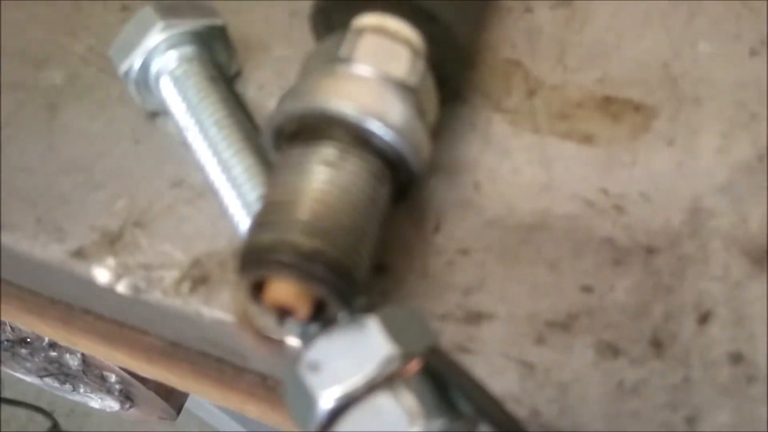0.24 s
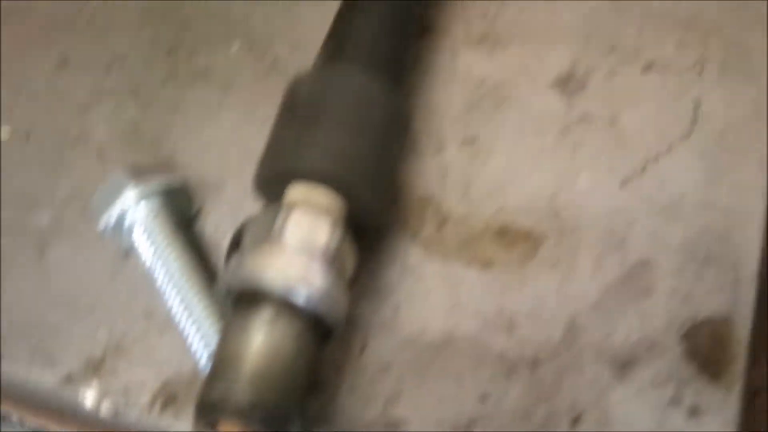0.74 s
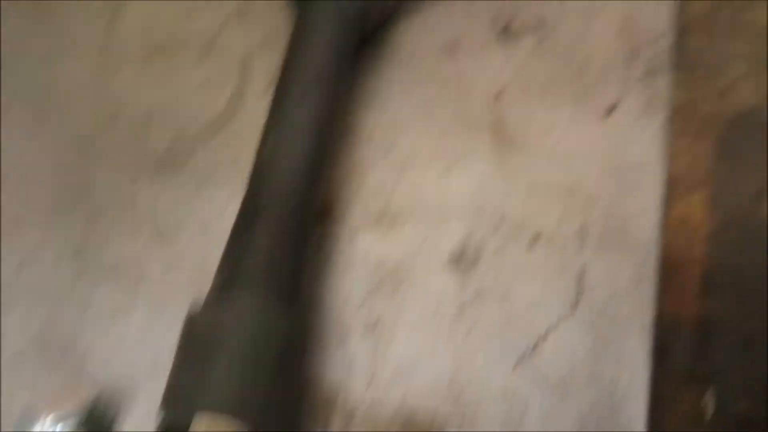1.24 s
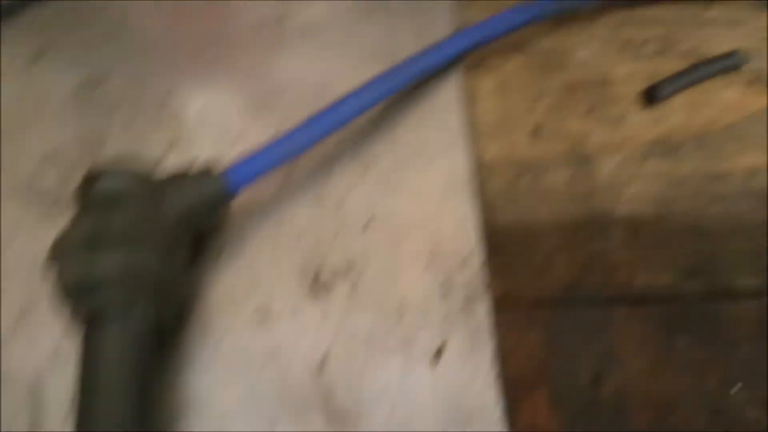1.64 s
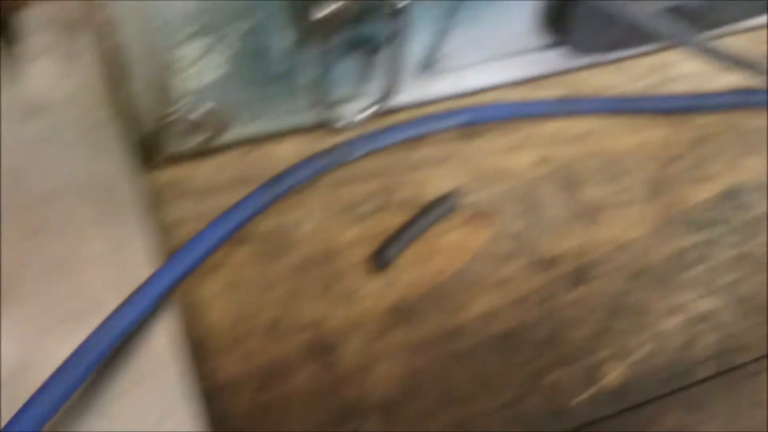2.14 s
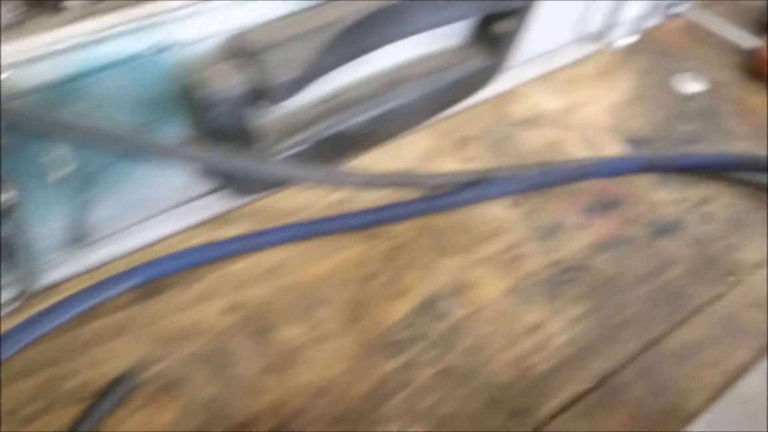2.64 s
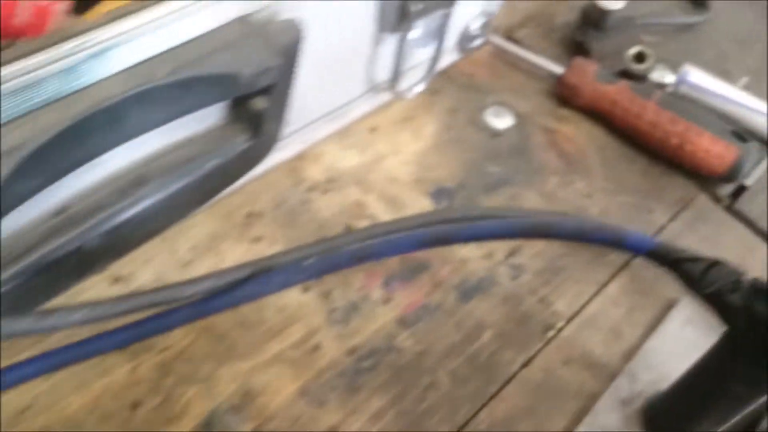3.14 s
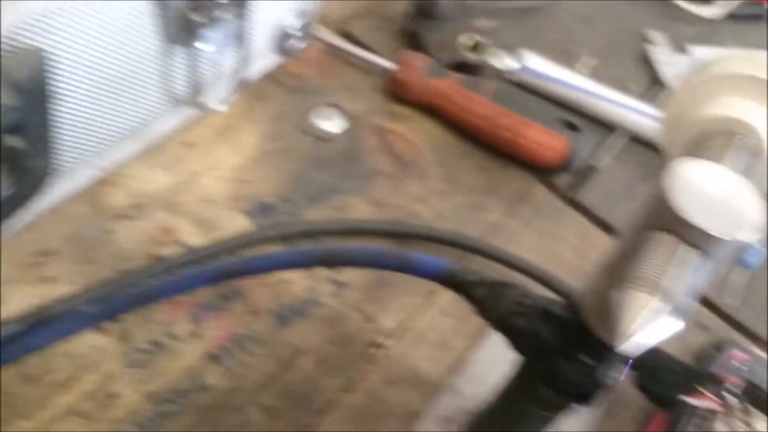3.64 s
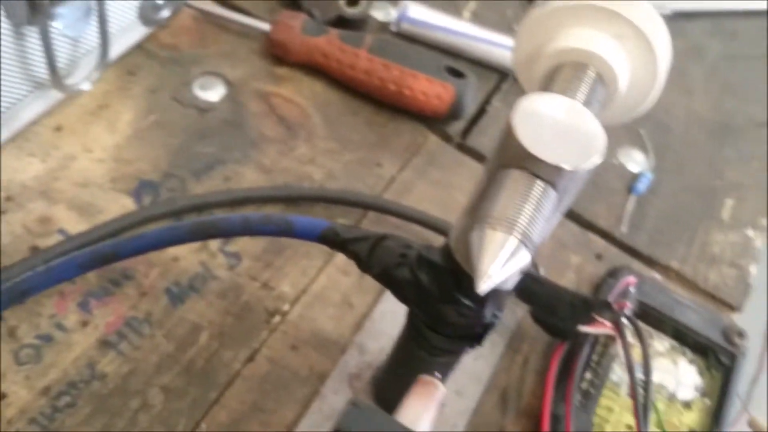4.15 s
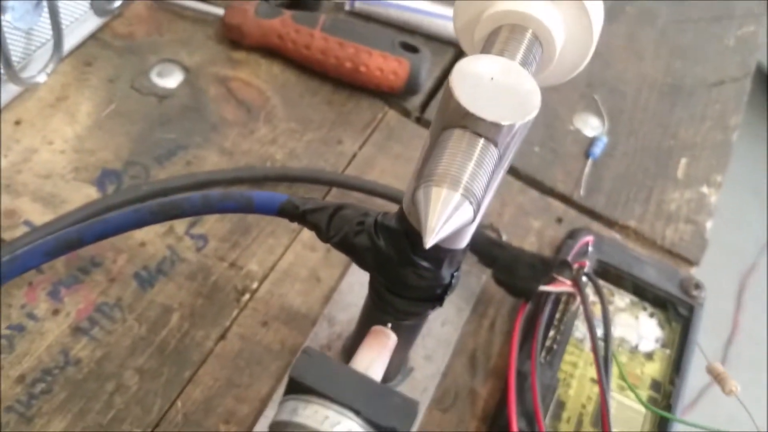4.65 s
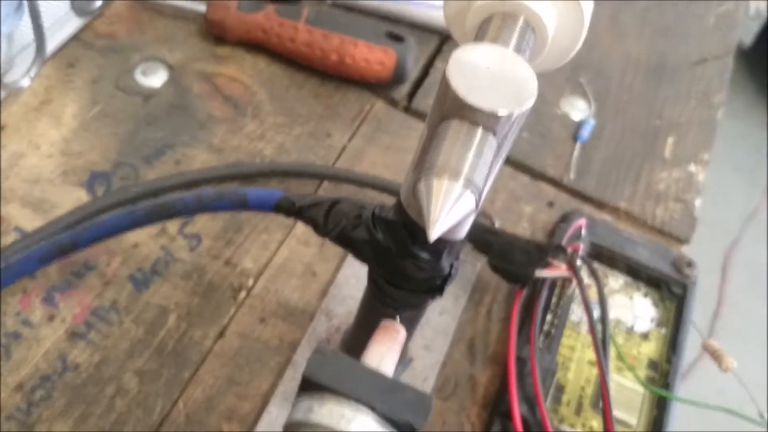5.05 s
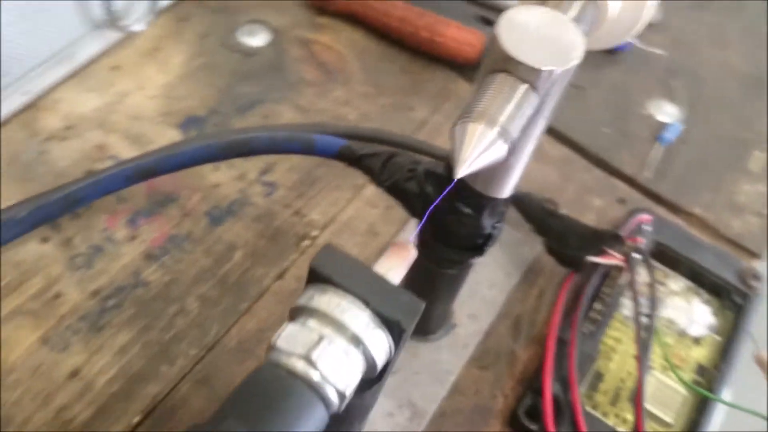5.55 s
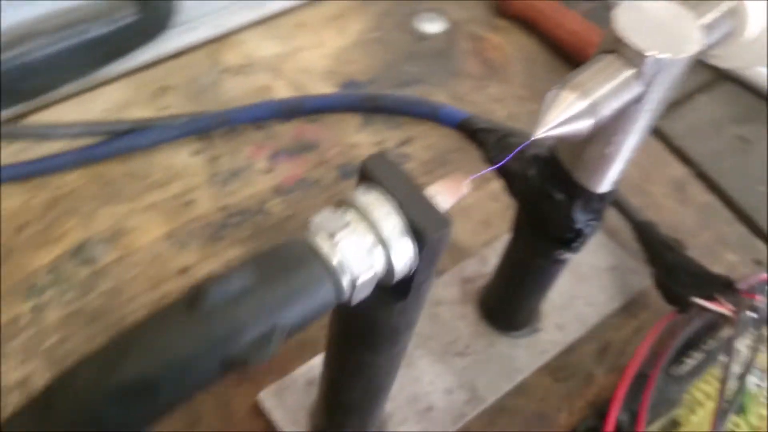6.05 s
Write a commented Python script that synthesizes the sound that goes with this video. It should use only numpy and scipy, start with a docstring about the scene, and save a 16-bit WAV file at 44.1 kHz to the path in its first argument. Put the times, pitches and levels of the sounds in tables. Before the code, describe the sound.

Sharp high-voltage sparks crackle quickly across a gap, close up, while an electric drill whines and rattles on a workbench.

```python
"""Sparks from an ignition coil snap across a spark plug and an open gap, 26 a second with some missing.
Each heats the air abruptly and launches a shock, which reflects off the workbench and its tools.
An electric drill turns the distributor: its motor whines and hums, its gears rattle and ring,
its brushes and fan hiss, and the bench resonates under it. A hand-held microphone with two ports
moves from the plug to the gap; the loudest snaps overload it."""
import sys
import numpy as np
from scipy import signal
from scipy.fft import rfft, irfft, next_fast_len
from scipy.io import wavfile
from scipy.ndimage import uniform_filter1d

SR = 44100
rng = np.random.default_rng(int(sys.argv[2]) if len(sys.argv) > 2 else 0)


def transcribe(u):
    """Save the signal u as a 16-bit wav file named by the first command-line argument.

    u: samples, shape (n,) or (channels, n), limited to [-1, 1]; the rate is SR.
    q: integer samples, one column per channel.
    """
    v = np.clip(np.atleast_2d(u).T, -1, 1)
    q = np.round(v * 32767).astype(np.int16)
    wavfile.write(sys.argv[1], SR, q)


N = 277389

# Microphone path. Each row: time in seconds, place from 0 at the plug to 1 at the gap.
MIC_PLACE = [(0, 0.14), (1.8, 0.13), (3.1, 0.82), (3.6, 1), (6.3, 0.9)]
# Likeness of the ports, near antiphase in the bass. Each row: frequency in Hz, correlation.
PORT_CORRELATION = [(30, -0.33), (130, -0.96), (300, -0.89), (640, -0.86), (1000, -0.46), (1400, 0.12),
                    (3000, 0.14), (7000, -0.049)]
# Motor speed. Each row: time in seconds, turns per second.
MOTOR_SPEED = [(0.0, 243.09), (0.3, 243.08), (0.6, 242.81), (0.9, 242.39), (1.35, 242.78), (1.7, 242.39),
               (2.0, 242.06), (2.3, 242.33), (2.7, 242.82), (3.2, 242.84), (3.7, 242.81), (4.2, 243.46),
               (4.7, 242.87), (5.4, 243.24), (5.75, 242.86), (6.29, 243.26)]
# Whine along the path. Each row: time in seconds, left and right level in dB. All levels are relative.
WHINE_LEVEL = [(0.01, -25, -61), (0.41, -28, -51), (0.59, -17.5, -42), (0.79, -28.5, -49), (1.21, -30, -35),
               (1.55, -20, -51), (1.93, -33.5, -40), (2.35, -19, -46), (2.45, -30, -50), (2.63, -19, -51),
               (2.81, -31, -36), (2.89, -19, -30), (3.19, -20, -29), (3.45, -35, -35), (3.59, -23, -44),
               (3.73, -32, -44), (4.99, -33.5, -35.5), (5.19, -27.5, -50), (5.61, -26, -61),
               (5.77, -32.5, -58), (6.01, -20, -52), (6.27, -29, -39)]
# Shaft harmonics, each changing once as the microphone moves. Each row: order, time of change in
# seconds, level before and after in dB, phase between the ports before and after in radians.
HUM_ORDERS = [(1, 2.8, -50, -58, 2.5, 2.5), (2, 1.65, -53, -45, 1.7, 3.0), (3, 1.9, -41.5, -46.3, 2.7, 1.8),
              (4, 3.0, -44, -48.5, 1.7, 1.5)]
# Drone of the bench. Each row: time in seconds, level in dB.
DRONE_LEVEL = [(0.0, -48.0), (0.06, -40), (0.14, -47.5), (0.18, -36), (0.35, -42), (0.4, -39), (0.61, -37),
               (0.71, -36), (1.07, -35.5), (1.14, -47), (1.31, -37), (1.36, -50), (1.39, -41), (1.7, -34.5),
               (1.83, -38), (2.0, -35.5), (2.13, -47.5), (2.16, -45), (2.41, -31), (2.57, -36), (2.68, -49),
               (2.83, -31), (2.94, -46), (3.04, -34), (3.15, -45.0), (3.4, -30), (3.56, -54), (3.6, -43.0),
               (3.75, -35), (3.81, -42), (3.97, -35), (4.05, -49.0), (4.23, -32), (4.35, -44), (4.48, -36),
               (4.62, -39), (4.81, -30), (4.98, -40), (5.25, -34), (5.31, -47), (5.63, -33), (5.95, -56),
               (6.04, -48), (6.28, -41)]
# Slow course of the drill's noise. Each row: time in seconds, rattle level in dB, hiss level in dB.
DRILL_LEVELS = [(0, -31, -28), (0.38, -31.5, -28.5), (0.6, -29, -28.5), (1.1, -31, -28.5),
                (1.35, -31, -29.5), (1.75, -29, -27), (2.05, -30, -27.5), (2.3, -30.5, -27),
                (2.6, -32, -28), (3.0, -33, -27.5), (3.3, -33.5, -29.5), (3.54, -36, -29.5),
                (3.8, -34.5, -29.5), (4.5, -34, -29.5), (4.95, -34.5, -30.5), (5.5, -33.5, -29.5),
                (5.87, -35.5, -30), (6.29, -34, -29)]
# Brief binding of the gears. Each row: centre and half-length in seconds, added rattle in dB.
GEAR_SURGES = [(0.198, 0.02, 2.5), (0.247, 0.027, 1.5), (0.52, 0.025, 0), (0.903, 0.036, 2.5),
               (1.06, 0.03, 0), (1.441, 0.03, 4), (1.878, 0.044, 2), (2.231, 0.017, 5.5), (2.408, 0.078, 2),
               (2.82, 0.052, 1.5), (3.08, 0.032, 1.5), (3.373, 0.05, 3), (3.696, 0.057, 3.5),
               (4.241, 0.022, 3), (4.44, 0.032, 3), (4.768, 0.096, 1), (5.567, 0.038, 3.5), (5.7, 0.026, 3),
               (6.062, 0.026, 5), (6.202, 0.022, 4.5)]
# Hard impacts of the teeth. Each row: start in seconds, level in dB.
TOOTH_KNOCKS = [(0.169, -10), (0.509, -9.5), (0.5688, -37), (0.8871, -8), (0.9094, -31), (1.083, -19),
                (1.1923, -15), (1.469, -11), (1.489, -20), (1.8246, -10), (2.2287, -17), (2.247, -24),
                (2.8533, -14), (2.9733, -11.5), (2.9931, -14), (4.4285, -22), (5.014, -15), (5.09, -17),
                (6.0112, -15)]
# Gear case modes. Each row: frequency and bandwidth in Hz, left and right level in dB,
# change from plug to gap in dB.
CASE_MODES = [(1508, 47, -41, -19.5, 17.5), (1610, 35, 2, -4, -43), (1666, 12.5, -1, 8, -6.5),
              (1704, 5.5, -26, -15, 8.5), (1748, 6.1, -18.5, -6.5, 11.5), (1905, 25, -27, -19, 12),
              (2060, 87, -24, -11, -18)]
# Ringing of the gear case. Each row: time in seconds, level in dB.
CASE_LEVEL = [(0.0, -32), (0.14, -35.5), (0.16, -27), (0.3, -22.5), (0.34, -39), (0.52, -27.5),
              (0.83, -28.5), (0.95, -28), (1.1, -26), (1.14, -35), (1.2, -24.5), (1.32, -34.5),
              (1.49, -23.5), (1.54, -31), (1.78, -22.5), (1.81, -29), (2.05, -34.0), (2.15, -23),
              (2.19, -30), (2.25, -20), (2.3, -33), (2.35, -25), (2.6, -32), (2.87, -26.5), (2.92, -33.5),
              (2.98, -26.5), (3.04, -30), (3.09, -27.0), (3.25, -30.5), (3.36, -28.5), (3.45, -32),
              (3.48, -37.5), (3.73, -27.5), (3.77, -40), (3.86, -29), (4.18, -33.5), (4.26, -30),
              (4.3, -42), (4.47, -27), (4.57, -37), (4.62, -31.5), (4.83, -28.5), (4.88, -38.5),
              (5.03, -30), (5.05, -38), (5.13, -29.5), (5.18, -40), (5.25, -30), (5.39, -39), (5.43, -31),
              (5.71, -28.5), (5.82, -38.5), (6.01, -30.5), (6.14, -34), (6.21, -27), (6.28, -38)]
# Bench and drill body modes. Each row: frequency and half-width in Hz, level at plug and at gap in dB.
BENCH_MODES = [(142.5, 10, -58, -43), (380, 105, -50, -31.5), (615, 3.2, -49, -42.5), (682, 14, -40, -44),
               (808, 2.9, -59, -43.5)]
# Spectra of the rattle, the hiss and a snap at plug and gap.
# Each row: frequency in Hz, left and right level in dB.
RATTLE_SPECTRUM = [(20, -41, -53), (60, -34.5, -29), (175, -22, -24.5), (378, -19.5, -23.5),
                   (460, -25.5, -20.5), (560, -15, -18), (670, -13.5, -15.5), (950, -17.5, -10.5),
                   (1234, -11, -15), (1176, -14.5, -26), (1510, -20.5, -12), (2000, -25.5, -21.5),
                   (2330, -43, -28), (3240, -30, -34), (4550, -71, -28.5), (9000, -57, -55)]
HISS_SPECTRUM = [(1200, -41, -40.5), (2460, -30, -34), (3340, -29, -32.5), (4140, -28.5, -42),
                 (4400, -30, -61), (4880, -20, -22.5), (5000, -27, -32.5), (6300, -21, -30),
                 (6550, -16.5, -26), (7440, -17.5, -34), (8000, -17.5, -21), (8850, -20, -26.5),
                 (9460, -15, -20), (12350, -28, -36.5), (12400, -35, -22.5), (13200, -38, -37.5),
                 (15600, -50, -36)]
PLUG_SPECTRUM = [(80, -39, -52), (352, -40, -32), (800, -10.5, -24), (1270, -10, -20), (1750, -16, -8),
                 (2400, -10, -30), (3100, -23.5, -8.5), (4500, -25, -22), (5280, -12, -11),
                 (6540, -4.5, -7), (9500, -3, -16), (10170, 3.5, -3), (11330, -7.5, 6.5), (11800, -6, -17),
                 (12500, -19, -1), (15500, -20.5, -2.5)]
GAP_SPECTRUM = [(82, -35, -44), (350, -31, -45), (1270, -11.5, -14.5), (1780, -24, -2.5),
                (2200, -15.5, -21.5), (2830, -29.5, -22), (3800, -15.5, -10.5), (4250, -22, -15),
                (5250, -17.5, -10), (5980, -18, -14), (6570, -1, -13), (8360, -1.5, -3), (9730, 2.5, -9.5),
                (10800, 4.5, -3.5), (11470, -8, -6), (13300, -20, -8.5), (16500, -14, -4.5)]
# Whistles at the fan's vents as the microphone passes.
# Each row: centre and half-length in seconds, frequency and half-width in Hz, level in dB.
VENT_WHISTLES = [(3.5, 0.42, 6600, 150, -34), (4.75, 1, 7980, 170, -33)]
# Discharges. Each row: approximate start in seconds, left and right level in dB, crack emphasis in dB.
DISCHARGES = [(0.022, -17, -20, -6), (0.06, -18.5, -24, -3), (0.098, -13.5, -16, -1), (0.137, -17, -23, -5),
              (0.175, -14, -18.5, -2), (0.252, -15, -20.5, -3), (0.29, -14.5, -21.0, -4),
              (0.367, -17, -23, -1), (0.406, -12, -22, 0), (0.482, -19, -23, -1), (0.521, -15, -20, -2),
              (0.598, -18, -20, 1), (0.675, -12, -19, -3), (0.752, -13.0, -17.5, 0),
              (0.829, -14.5, -20, -3), (0.867, -16.5, -23, 4), (0.944, -16.5, -22, 1), (0.983, -14, -21, 5),
              (1.06, -15.5, -23, 3), (1.136, -13.5, -22, 9), (1.213, -16, -23, 7), (1.29, -14.5, -22, 3),
              (1.329, -15.0, -22, 4), (1.406, -13.0, -22, 1), (1.444, -9.5, -18, -4),
              (1.483, -11, -19.5, 1), (1.521, -15, -21.0, -1), (1.598, -12, -20.0, -2),
              (1.637, -12, -22, 0), (1.675, -12, -22, -2), (1.714, -13, -22, 2), (1.752, -12, -20, 4),
              (1.791, -16, -20, 9), (1.829, -12, -21, 5), (1.868, -13, -21, 4), (1.945, -11, -20, -2),
              (1.983, -13, -20, 1), (2.06, -14.0, -21, -1), (2.099, -10, -19, -2), (2.137, -9, -14, -2),
              (2.176, -14, -21, -1), (2.214, -12, -22, -4), (2.253, -7.5, -22, -7), (2.292, -12, -25, -4),
              (2.369, -11, -21, -2), (2.407, -12.5, -23, 0), (2.484, -11, -22, -3), (2.522, -12, -23.0, 4),
              (2.561, -14.0, -23.5, 3), (2.638, -11, -22, -1), (2.676, -8.5, -25.0, -3),
              (2.715, -11, -23, -1), (2.753, -8, -24, -2), (2.792, -9, -20, -3), (2.869, -13, -21.0, 7),
              (2.907, -11, -19, 0), (2.945, -10, -19.5, 1), (2.984, -13, -18, 2), (3.022, -14, -23, -6),
              (3.061, -9, -22, -3), (3.099, -12, -21, 0), (3.176, -11, -18, -3), (3.214, -11.0, -17, -2),
              (3.253, -8.5, -19, -5), (3.291, -10, -16, -4), (3.368, -6, -17, -6), (3.407, -6, -16, -5),
              (3.56, -12.0, -16.5, 7), (3.599, -10, -14, 4), (3.637, -8.5, -14, -5), (3.714, -8, -13, -7),
              (3.753, -5, -11, -4), (3.791, -10, -17, 0), (3.829, -10, -13, -4), (3.868, -7.5, -12.5, -6),
              (3.906, -8, -13.5, 1), (3.945, -6, -12, -2), (3.983, -8, -18, 0), (4.021, -9, -16, 3),
              (4.06, -7.5, -13, -1), (4.098, -8, -17.5, 4), (4.29, -11, -21, -1), (4.328, -5, -13.5, 1),
              (4.367, -7.5, -14, -6), (4.52, -8.5, -21, 3), (4.635, -14.0, -27, -7),
              (4.943, -12, -24.0, -2), (5.211, -12.0, -21, -3), (5.327, -7, -17.5, 5), (5.365, -8, -19, 3),
              (5.403, -8, -16, 1), (5.442, -10.5, -17, 4), (5.48, -7.5, -15.5, 3), (5.518, -8, -16, 9),
              (5.595, -7, -15, 4), (5.634, -9, -19, 5), (5.672, -9.5, -20.0, 3), (5.71, -10, -17, 3),
              (5.749, -7.5, -17, 7), (5.787, -9, -15, 2), (5.826, -11.0, -18, 8), (5.864, -11, -18, 4),
              (5.903, -10, -19, 0), (5.941, -11.0, -19, -1), (5.979, -12.5, -19, 2), (6.018, -15, -19, 7),
              (6.056, -14, -18, 4), (6.133, -11.5, -18, -5), (6.171, -11.5, -16, 2), (6.21, -12, -19, -1),
              (6.248, -14, -18, -4)]
# Paths of a shock, first direct, then off bench and tools. Each row: delay at plug and at gap in
# seconds, left level at plug and at gap in dB, right level in dB.
SHOCK_PATHS = [(0, 0, -2, 0, 0), (.0007, .00062, 0, -6.5, -7.5), (.0014, .00105, -5, -6, -7),
               (.00205, .00155, -5, -10, -12), (.0029, .0025, -12, -11, -16)]
# Modes of a thin metallic ring. Each row: frequency and half-width in Hz, level at plug and at gap in dB.
METAL_MODES = [(4600, 97, -9, 13), (4960, 64, 1.5, -12)]
# Fits of that ring. Each row: centre and half-length in seconds, level in dB.
METAL_FITS = [(0.06, 0.036, -38), (0.232, 0.12, -33.5), (0.532, 0.11, -34.5), (0.696, 0.03, -29.5),
              (0.813, 0.0098, -30), (0.908, 0.063, -35), (1.08, 0.053, -39), (1.466, 0.071, -37.5),
              (1.736, 0.02, -30), (1.864, 0.048, -35), (2.232, 0.019, -42), (2.43, 0.035, -42)]
# Bumps of the hand and booms of the bench.
# Each row: centre and half-length in seconds, frequency in Hz, level in dB.
HAND_BUMPS = [(0.896, 0.034, 203, -33), (1.753, .05, 216, -32.5), (1.885, 0.038, 153, -33.5),
              (2.407, 0.097, 230, -43), (3.768, 0.046, 70, -50)]
BENCH_BOOMS = [(1.45, 0.056, 700, -30.5), (1.8, 0.15, 678, -32)]

GEAR_RATIO, TURNS_PER_SPARK, FIRST_SPARK_TURNS = 5, 28 / 3, 5.27
TIME = np.arange(N) / SR
SHAFT_TURNS = np.cumsum(np.interp(TIME, *np.transpose(MOTOR_SPEED))) / SR
SHAFT_ANGLE = 2 * np.pi * SHAFT_TURNS
FFT_SIZE = next_fast_len(N, real=True)
BINS_HZ = np.fft.rfftfreq(FFT_SIZE, 1 / SR)


def amp(db):
    """Amplitude ratio of a level in decibels."""
    return 10 ** (np.asarray(db) / 20)


def unit_rms(x):
    """Normalisation to rms 1."""
    return x / np.sqrt(np.mean(x ** 2) + 1e-20)


def curve(table, column=1):
    """Linear interpolation of a time table at every sample."""
    rows = np.array(table)
    return np.interp(TIME, rows[:, 0], rows[:, column])


def spectrum(table, hz):
    """Interpolation of a spectrum table on a logarithmic frequency axis."""
    table_hz, *columns = np.transpose(table)
    return np.array([np.interp(np.log(hz + 1), np.log(table_hz + 1), c) for c in columns])


def at_place(plug, gap):
    """Linear blend from plug to gap, following the microphone."""
    return plug + (gap - plug) * curve(MIC_PLACE)


def swell(centre_s, half_s):
    """Gaussian envelope, down to 1/e at half_s from its centre."""
    return np.exp(-((TIME - centre_s) / half_s) ** 2)


def drift(rate_hz, size=16384):
    """Random fluctuation of rms 1: noise low-passed at rate_hz."""
    hz = np.fft.rfftfreq(size, TIME[-1] / size)
    slow = irfft(rfft(rng.standard_normal(size)) / (1 + (hz / rate_hz) ** 2))
    return np.interp(TIME, np.linspace(0, TIME[-1], size), unit_rms(slow))


def port_noise(gain):
    """Partially coherent noise at the two ports, shaped by gain(hz)."""
    left, independent = rfft(rng.standard_normal((2, FFT_SIZE)))
    correlation = spectrum(PORT_CORRELATION, BINS_HZ)[0]
    right = correlation * left + np.sqrt(1 - correlation ** 2) * independent
    return irfft(np.array([left, right]) * gain(BINS_HZ), FFT_SIZE)[:, :N]


def resonance(centre_hz, half_width_hz):
    """A randomly driven mode gives narrow-band noise, here of rms 1."""
    return unit_rms(port_noise(lambda hz: 1 / (1 + ((hz - centre_hz) / half_width_hz) ** 2)))


def modal_sum(modes):
    """Superposition of randomly driven modes, each as strong as the microphone's place makes it."""
    return sum(amp(at_place(plug_db, gap_db)) * resonance(hz, width)
               for hz, width, plug_db, gap_db in modes)


def sustained(x, over_s=0.07):
    """Division by the running rms holds a ring steady and keeps its quick flutter."""
    size = round(over_s * SR)
    power = uniform_filter1d(uniform_filter1d((x ** 2).mean(0), size), size // 2)
    return x / np.sqrt(abs(power) + 1e-20)


def colour(x, table, size=2048):
    """Minimum-phase filter of unit energy for each port, from the folded cepstrum."""
    gain = amp(spectrum(table, np.fft.rfftfreq(size, 1 / SR)))
    cepstrum = irfft(np.log(gain))
    cepstrum[:, 1:size // 2] *= 2
    cepstrum[:, size // 2 + 1:] = 0
    taps = irfft(np.exp(rfft(cepstrum)))
    taps /= np.linalg.norm(taps, axis=1, keepdims=True)
    return signal.oaconvolve(x, taps, axes=1)[:, :N]


def motor_whine(order=39, gain_db=1, flutter_db=1, throb=0.24, wobble_rad=0.9, next_order_db=-17):
    """A high shaft harmonic, modulated by the output gear, swells as the ports cross standing waves."""
    gear = np.sin(SHAFT_ANGLE / GEAR_RATIO)
    ports = []
    for column in (1, 2):
        level = amp(curve(WHINE_LEVEL, column) + gain_db + flutter_db * drift(22))
        phase = order * SHAFT_ANGLE + wobble_rad * gear + 0.3 * drift(60) + 0.5 * drift(1.6)
        tone = np.sin(phase) + amp(next_order_db) * np.sin(phase + SHAFT_ANGLE)
        ports.append(level * (1 + throb * gear) * tone)
    return np.sqrt(2) * np.array(ports)


def motor_hum(jitter_rad=0.13, waver_db=3, change_s=0.28):
    """Forced vibration: the bench radiates the lowest harmonics of the shaft."""
    out = np.zeros((2, N))
    for order, s, before_db, after_db, before_rad, after_rad in HUM_ORDERS:
        moved = (1 + np.tanh((TIME - s) / change_s)) / 2
        phase = order * (SHAFT_ANGLE + jitter_rad * drift(0.73))
        level = amp(before_db + (after_db - before_db) * moved + waver_db * drift(15))
        port_shift = before_rad + (after_rad - before_rad) * moved
        out += np.sqrt(2) * level * np.sin([phase, phase + port_shift])
    return out


def bench_drone(hz=285, half_width_hz=14, gain_db=-1):
    """Resonance: the drill unevenly drives a strong low mode of the bench."""
    return amp(curve(DRONE_LEVEL) + gain_db) * sustained(resonance(hz, half_width_hz))


def surge_db():
    """Binding gears chatter harder: the rise in level in dB."""
    return sum(more_db * swell(s, half_s) for s, half_s, more_db in GEAR_SURGES)


def tooth_band(hz, centre_hz=1600, half_width_hz=750):
    """Excitation spectrum of a tooth impact: a flat-topped band."""
    return 1 / (1 + ((hz - centre_hz) / half_width_hz) ** 4)


def gear_case(knocking):
    """Damped modes of the gear case ring on after each impact."""
    out = np.zeros((2, N))
    for hz, width, left_db, right_db, change_db in CASE_MODES:
        mode = signal.lfilter(*signal.iirpeak(hz, hz / width, fs=SR), knocking)
        mode *= np.sqrt(SR / (np.pi * width))  # equal noise power at any bandwidth
        out += amp([[left_db], [right_db]]) * amp(at_place(0, change_db)) * mode
    return out


def gears(rattle_db=29.5, drive_db=-31, bench_db=30, knock_db=17, knock_s=0.0059, clang_db=13):
    """Impact excitation: teeth chatter, harder once per output turn, and the case and bench ring."""
    chatter_db = 2.2 * drift(59) - np.sin(SHAFT_ANGLE / GEAR_RATIO + drift(2))
    force = amp(curve(DRILL_LEVELS) + surge_db())
    blows = np.zeros(N)
    for s, db in TOOTH_KNOCKS:
        blows[round(s * SR)] = amp(db)
    knock_decay = amp(knock_db) * signal.lfilter([1], [1, -np.exp(-1 / (knock_s * SR))], blows)
    rattle_noise = port_noise(lambda hz: amp(spectrum(RATTLE_SPECTRUM, hz)))
    rattle = amp(rattle_db + chatter_db) * force * rattle_noise
    knocks = knock_decay * port_noise(lambda hz: amp(spectrum(RATTLE_SPECTRUM, hz)) * tooth_band(hz))
    case_drive = amp(drive_db + 1.17 * chatter_db) * port_noise(tooth_band) + amp(clang_db) * blows
    case = amp(curve(CASE_LEVEL)) * sustained(gear_case(case_drive))
    bench = amp(bench_db) * force * modal_sum(BENCH_MODES)
    return rattle + knocks + case + bench


def brush_and_fan_hiss(gain_db=27.5, surge_share=0.53, waver_db=1.55, flicker_db=1, vent_right_db=-7):
    """Broadband noise of brushes and fan lifts with each surge; narrow bands whistle at the vents."""
    course_db = curve(DRILL_LEVELS, column=2) + gain_db + surge_share * surge_db()
    level = amp(course_db + waver_db * drift(44) + flicker_db * drift(210))
    vents = sum(amp(db) * swell(s, half_s) * resonance(hz, width)
                for s, half_s, hz, width, db in VENT_WHISTLES)
    hiss = level * port_noise(lambda hz: amp(spectrum(HISS_SPECTRUM, hz)))
    return hiss + amp([[0], [vent_right_db]]) * vents


def snap(scatter, place, sway=0.06, scatter_db=-22, shield_db=7, echo_s=0.0069, lead_samples=8):
    """Multipath propagation: a shock arrives directly, then as reflections, wall echo and room tail."""
    t = np.arange(scatter.shape[1]) / SR
    near = np.exp(-t / 0.0022)
    echo = amp(-9) * (t > echo_s) * np.exp(-abs(t - echo_s) / 0.0012)
    room = amp(-19) * np.exp(-t / 0.018)
    # The plug's electrodes shield its spark, so more of it arrives scattered.
    scatter_gain = amp(scatter_db + shield_db * (1.5 - place))
    out = scatter_gain * scatter * np.sqrt(near ** 2 + echo ** 2 + room ** 2)
    out[:, :lead_samples] = 0
    for k, (plug_s, gap_s, plug_db, gap_db, right_db) in enumerate(SHOCK_PATHS):
        delay = (plug_s + (gap_s - plug_s) * place) * (1 + sway * scatter[:, k:k + 1])
        left_db = plug_db + (gap_db - plug_db) * place
        out += amp([[left_db], [right_db]]) * np.sinc((t - delay) * SR - lead_samples)
    return out / np.linalg.norm(out, axis=1, keepdims=True)


def sparks(left_db=24, right_db=26.5, same_path_s=0.17, gap_wander=0.28, size=3000):
    """Each discharge launches a shock; its reflections decorrelate as arc and microphone move."""
    out = np.zeros((2, N))
    scatter, last_s = rng.standard_normal((2, size)), 0
    for near_s, *ports_db, _ in DISCHARGES:
        # A spark falls on the nearest firing of the distributor.
        firing = round((np.interp(near_s, TIME, SHAFT_TURNS) - FIRST_SPARK_TURNS) / TURNS_PER_SPARK)
        s = np.interp(FIRST_SPARK_TURNS + firing * TURNS_PER_SPARK, SHAFT_TURNS, TIME)
        place = np.interp(s, *np.transpose(MIC_PLACE))
        # The long arc of the open gap wanders; the plug's short one hardly does.
        kept = (1 - gap_wander * place) * np.exp(-abs(s - last_s) / same_path_s)
        scatter = kept * scatter + np.sqrt(1 - kept ** 2) * rng.standard_normal((2, size))
        last_s = s
        start = round(s * SR)
        out[:, start:start + size] += amp(ports_db)[:, None] * snap(scatter, place)[:, :N - start]
    return amp([[left_db], [right_db]]) * at_place(colour(out, PLUG_SPECTRUM), colour(out, GAP_SPECTRUM))


def crack(snaps, cutoff_hz=170, crack_hz=4100, width_hz=3200, crack_db=-5):
    """A small source radiates little bass; its upper mids stand out, more in some sparks than others."""
    thin = signal.lfilter(*signal.butter(2, cutoff_hz, "high", fs=SR), snaps)
    upper_mids = signal.lfilter(*signal.iirpeak(crack_hz, crack_hz / width_hz, fs=SR), thin)
    return thin + amp(crack_db + curve(DISCHARGES, column=3)) * upper_mids


def metallic_ring(flutter_db=3):
    """Two modes ring in fluttering fits; the lower takes over as the microphone leaves the plug."""
    fits = sum(amp(db) * swell(s, half_s) for s, half_s, db in METAL_FITS)
    ring = modal_sum(METAL_MODES)
    return amp(flutter_db * drift(110)) * fits * ring


def hand_bumps(half_width_hz=40):
    """Structure-borne sound: the hand shifts on the microphone with soft, low bumps."""
    return sum(amp(db) * swell(s, half_s) * resonance(hz, half_width_hz)
               for s, half_s, hz, db in HAND_BUMPS)


def bench_booms(half_width_hz=18):
    """A resonance of the bench swells under the drill."""
    return sum(amp(db) * swell(s, half_s) * resonance(hz, half_width_hz)
               for s, half_s, hz, db in BENCH_BOOMS)


def bench_top_knock(snaps, hz=2400, width_hz=700, gain_db=7, over_s=2.98, half_s=0.63):
    """A well-damped mode of the wooden top answers the snaps while the microphone passes over it."""
    knock = signal.lfilter(*signal.iirpeak(hz, hz / width_hz, fs=SR), snaps)
    return amp(gain_db) * swell(over_s, half_s) * knock


def scene():
    """Superposition of the sparks, the drill, the bench and the hand at the two ports."""
    snaps = crack(sparks())
    drill_and_bench = motor_whine() + motor_hum() + bench_drone() + gears() + bench_booms()
    return snaps + bench_top_knock(snaps) + drill_and_bench + metallic_ring() + brush_and_fan_hiss() + hand_bumps()


def record(dry, ceiling=0.68, knee=6, edge_hz=15950):
    """Saturation flattens the loudest snaps; a low-pass filter then limits the band."""
    clipped = dry / (1 + (dry / ceiling) ** knee) ** (1 / knee)
    lowpass = signal.firwin(255, edge_hz, window=("kaiser", 8), fs=SR)
    return signal.oaconvolve(clipped, lowpass[None], "same", axes=1)


dry = scene()
out = record(dry)
transcribe(out)
```